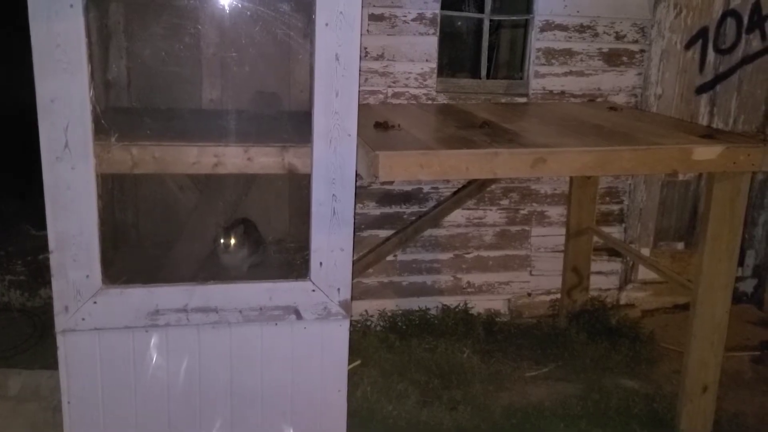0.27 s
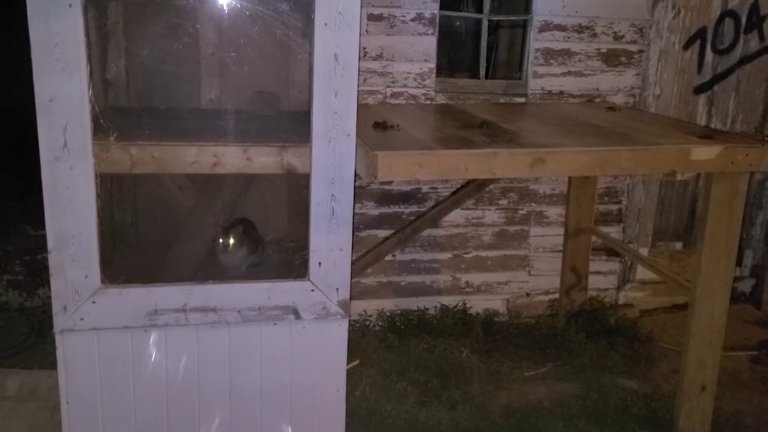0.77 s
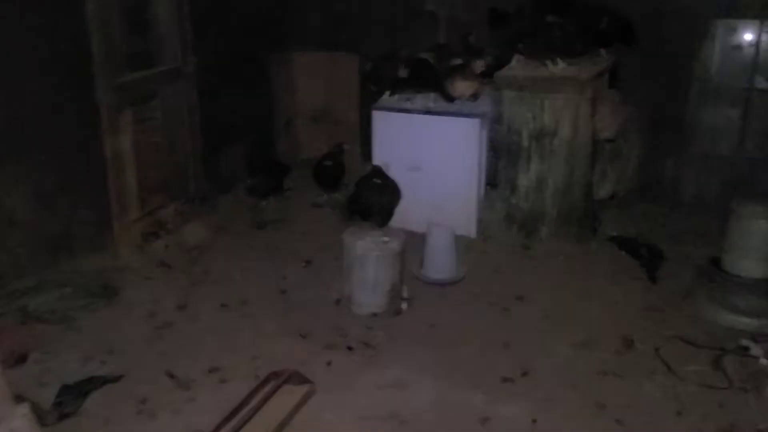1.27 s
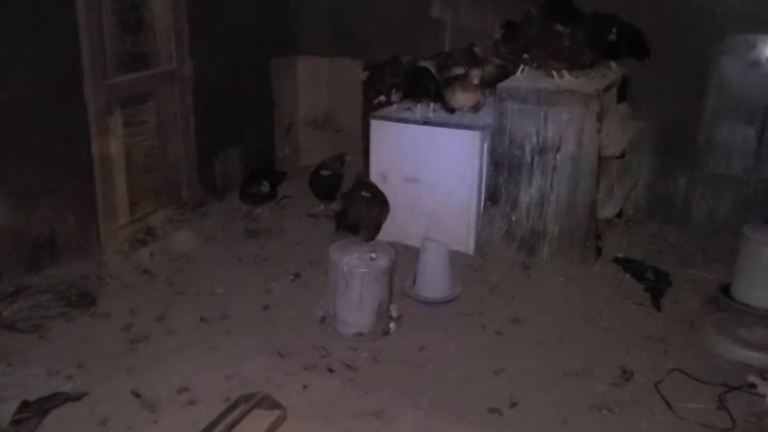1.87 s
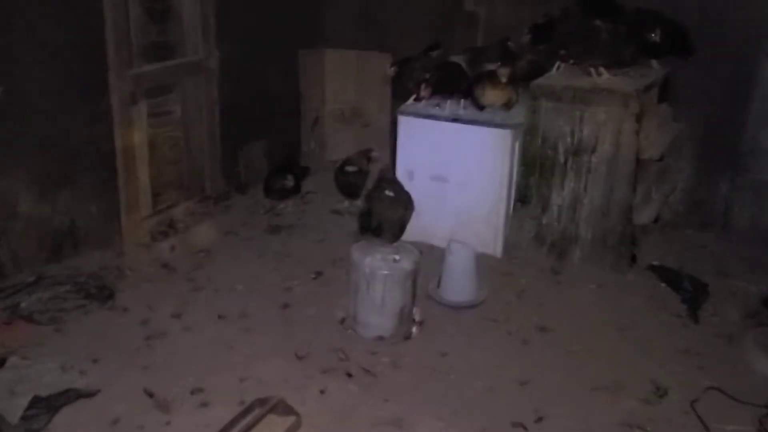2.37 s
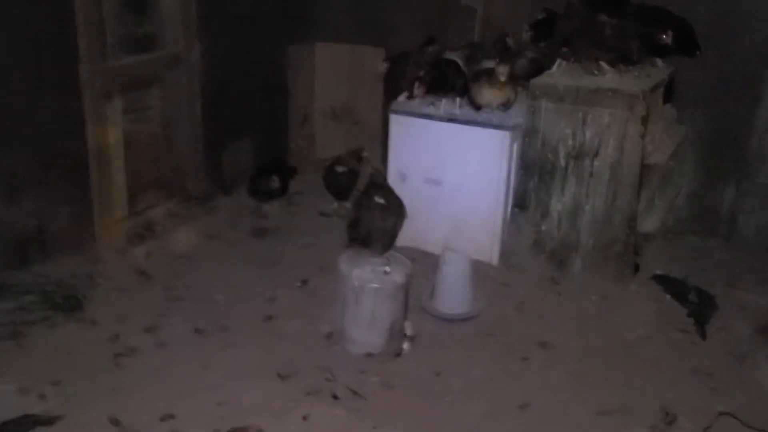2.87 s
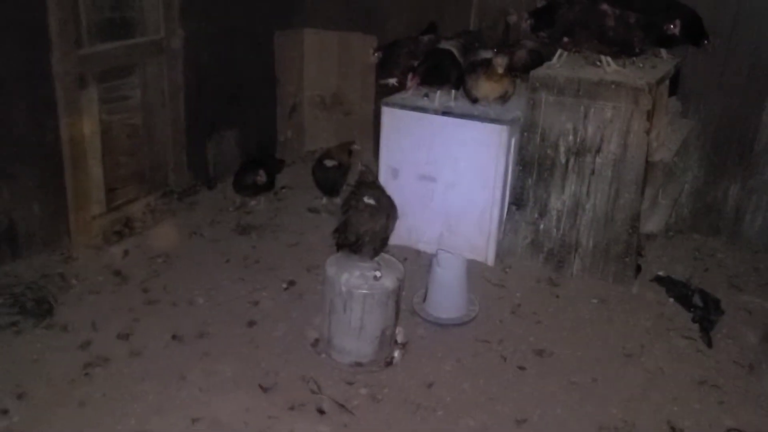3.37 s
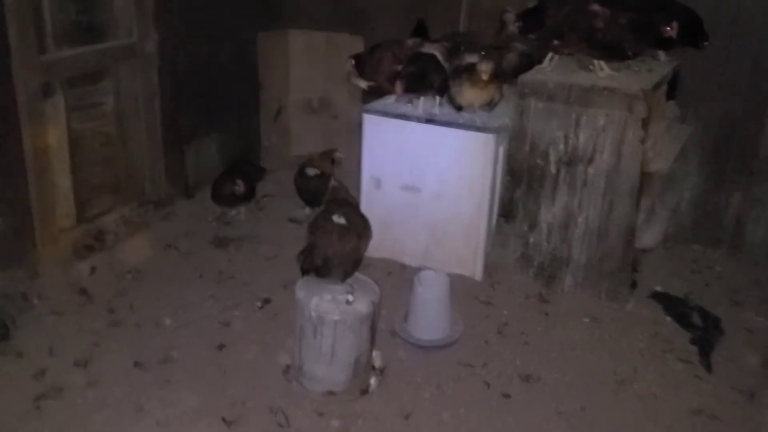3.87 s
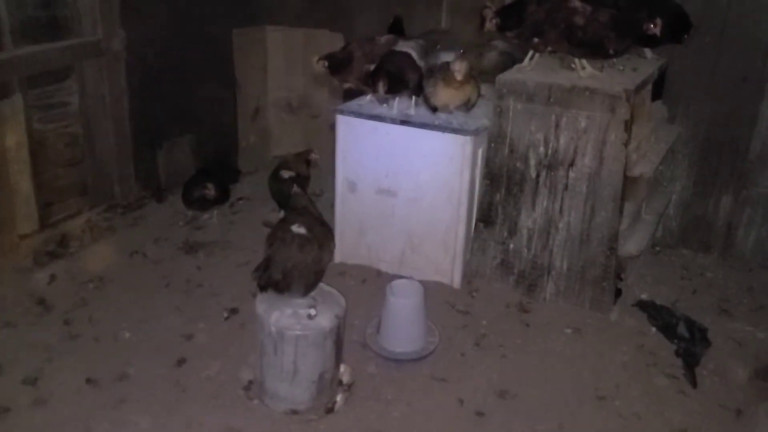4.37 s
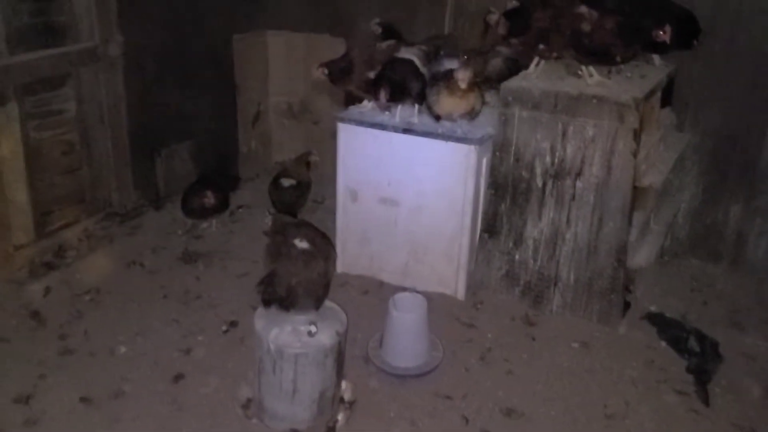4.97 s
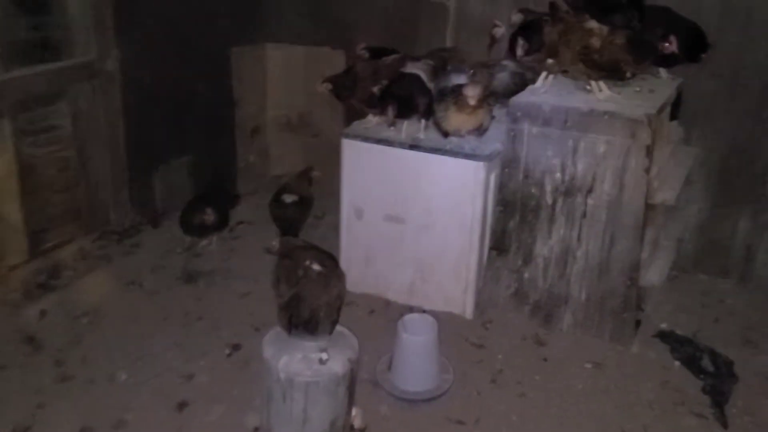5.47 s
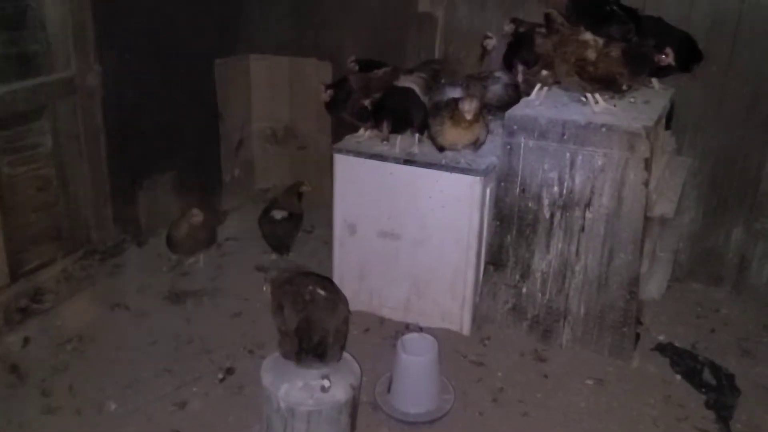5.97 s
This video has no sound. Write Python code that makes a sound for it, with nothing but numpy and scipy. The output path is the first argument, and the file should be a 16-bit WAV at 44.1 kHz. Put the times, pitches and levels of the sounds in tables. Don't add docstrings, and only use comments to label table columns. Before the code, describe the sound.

Very quiet night air outdoors with faint high cricket trills, one closer at the left, over a low hum. It cuts abruptly into a small plank coop: dry litter scuffs, a hollow feeder is bumped, and a hen gives a short throaty cluck. After sparse ticks and a low wall boom, another hen squawks sharply, birds scramble, a board is knocked, and rustling settles. Close stereo microphone near the floor, slight hiss.

```python
import sys
import numpy as np
from scipy import signal
from scipy.fft import rfft, irfft, next_fast_len
from scipy.io import wavfile
from scipy.ndimage import uniform_filter1d, map_coordinates

SR = 44100
rng = np.random.default_rng(int(sys.argv[2]) if len(sys.argv) > 2 else 0)


def dump(signal):
    limited = np.clip(np.atleast_2d(signal).T, -1, 1)
    pcm = np.round(limited * 32767).astype(np.int16)
    wavfile.write(sys.argv[1], SR, pcm)


def nominal_scale(level):
    x = np.asarray(level, float) / 20
    return 10 ** x


N = 273640
TIME = np.arange(N) / SR
INSIDE_S = 1.633
LEAD = 400
LEAD_S = LEAD / SR

# f/Hz, density/dB
NIGHT_AIR = [(15, -40), (25, -10.5), (86, -3), (99, -11), (133, -19), (165, -22.5), (234, -28.5),
             (268, -28.5), (390, -26.5), (600, -30.5), (950, -31.5), (1250, -27.5), (1800, -33.5),
             (4170, -37), (4780, -43.5), (6420, -57.5), (15600, -44.5)]
NIGHT_AIR_DB = -61.5
# t/s, length/s, level/dB
CRICKET_TRILLS = [
    (.075, 0.2, -82.5),
    (.4, .14, -82),
    (.575, .03, -84),
    (.625, .02, -84),
    (.67, 0.064, -82),
    (.78, .07, -87),
    (.897, .13, -82),
    (1.05, .06, -88),
    (1.16, 0.31, -83),
    (1.518, 0.13, -82),
]
# t/s, level/dB
NEAR_CHIRPS = [(.085, -3), (.14, -3), (.185, 4), (.232, 1), (.28, -2), (.44, -2), (.485, -2), (.53, 1),
               (.587, 1), (.635, -1), (.685, -3), (.732, -3), (.78, -2)]
CHIRP_HZ, CHIRP_FALL_HZ, CHIRP_S, CHIRP_DB, CHIRP_GAP_S = 4810, 560, .028, -80.5, .048

# t/s, length/s, level/dB
FLOOR_STEPS = [(1.606, 0.05, -58), (1.738, 0.026, -54.5), (2.078, 0.026, -56), (3.06, 0.036, -67),
               (3.22, 0.03, -58), (3.442, 0.022, -64.5), (3.587, 0.05, -54.5), (3.841, 0.14, -59),
               (3.975, 0.021, -56), (4.067, 0.19, -59), (4.195, 0.14, -63.5), (4.431, 0.046, -41.5),
               (4.654, 0.058, -62), (4.761, 0.072, -48.5), (4.914, 0.49, -59.5), (5.249, 0.063, -50.5),
               (5.4, 0.063, -48), (5.481, 0.27, -51), (5.8, 0.17, -55), (6.046, 0.12, -59.5)]
# t/s, length/s, level/dB, weight/dB,
# dryness/dB
SCUFFS = [(1.655, 0.073, -73, -4, 2), (1.755, 0.021, -75.5, 15, 3), (1.78, 0.075, -73.5, -9, 1),
          (1.885, 0.057, -48.5, -5, -16), (2.03, 0.07, -60.5, -1.5, -2), (2.15, 0.1, -70.5, -0.5, -6),
          (2.54, 0.055, -68.5, 5.5, -18), (2.64, 0.094, -67, 0.5, -7), (2.86, 0.13, -64, 0.5, -18),
          (3.04, 0.093, -67, 3.5, -21), (3.14, 0.012, -66.5, 10, -19), (3.6, 0.16, -67.5, -2, -7.5),
          (3.87, 0.091, -68, -2.5, -13), (3.935, 0.031, -65, 5, -16), (4.05, 0.1, -58, -2.5, -18),
          (4.115, 0.032, -56, -16, -17), (4.19, 0.16, -70.5, -3, -23),
          (4.3, 0.025, -62.5, -10, -7), (4.345, 0.071, -48, -7.5, -18), (4.401, 0.095, -43.5, -0.5, -12),
          (4.469, 0.045, -45, -16, -7.5), (4.54, 0.1, -49.5, -20, -20), (4.63, 0.036, -43, -5, -24),
          (4.7, 0.068, -66, 5, -12), (4.885, 0.049, -51.5, -7.5, -16.5), (4.935, 0.13, -56.5, -2, -8),
          (5.035, 0.074, -53, -5.5, -9), (5.1, 0.079, -54, -4.5, -29), (5.225, 0.077, -50.5, -1, -24),
          (5.32, 0.058, -56, -6.5, -18), (5.4, 0.15, -62, -1.5, -15.5), (5.57, 0.23, -64, -5, -26),
          (5.889, 0.19, -68, 6, -3.5)]
# f/Hz, density/dB
LITTER = [(59, -30), (100, 0.5), (185, -7.5), (259, -2), (355, -4), (520, -4), (714, -2), (920, -3.5),
          (1850, -7), (2280, -10.5), (3270, -11), (6030, -34), (7610, -37.5), (11400, -33.5),
          (15600, -38.5)]
STIR_DB = (-74.5, -76, -72, -69, -78)
FLICKER = (.5, .9, .9, .8, .6)
SCRAPE_SHARE, SCRAPE_DB = 0.88, -0.5
ATTACK_S, ATTACK_SHARE, RELEASE_S, RELEASE_SHARE = 0.0067, 0.11, 0.17, 2.4

# t/s, peak/dB, ring f/Hz, thud/dB, chaff/dB
TICKS = [
    (2.4943, -46.5, 1840, -14, -44),
    (2.5259, -45.5, 1910, -14, -44),
    (4.5053, -31.5, 1776, -7.5, -21),
    (4.6292, -32, 2626, -25, -17),
    (4.9439, -49.5, 3900, -13, -39),
    (5.0374, -43, 4680, 0, -4.5),
    (5.1423, -38.5, 2033, -24, -39),
    (5.998, -57.5, 4910, 3, -8),
]
# t/s, peak/dB, thud/dB, chaff/dB
SNAPS = [(1.6342, -49, -4, -29), (1.66, -50, -12, -27), (1.765, -44, -4.5, -23), (1.9732, -55, -17, -34),
         (2.6533, -55, 6, -23), (2.857, -34.5, -22, -31), (3.1503, -43, -16, -46), (2.4958, -44, -26, -38),
         (2.5303, -42, -22, -43), (3.589, -63, 8.5, -24), (4.486, -29.5, -9.5, -22), (4.601, -44, -24, -18),
         (4.908, -55, -22, -16), (5.0341, -44, -5, 0), (5.144, -27.5, -31, -23)]
# t/s, peak/dB, ring f/Hz, t60/s
BUMPS = [
    (1.631, -46.5, 91.5, 0.07),
    (2.116, -46, 85.5, 0.094),
    (2.565, -51, 540, 0.053),
    (2.579, -61, 280, 0.093),
    (2.902, -51, 260, 0.03),
    (2.964, -47.5, 216, 0.027),
    (3.6, -50, 100, 0.062),
    (3.947, -66, 100, 0.031),
]
# t/s, peak/dB, favoured f/Hz, contact/s, crunch/dB
NUDGES = [(1.716, -61, 850, 0.0034, -20), (1.74, -49, 850, 0.005, -20), (1.88, -36, 740, 0.016, -17),
          (1.901, -35.5, 705, 0.035, -22), (2.025, -33.5, 820, 0.0082, 0), (2.04, -41, 970, 0.017, -20),
          (2.094, -39, 690, 0.0059, -40), (2.115, -54.5, 716, 0.028, -30), (2.494, -52, 750, 0.0066, -13),
          (2.845, -53, 1033, 0.011, -14), (2.857, -48, 1020, 0.0021, -13), (3.15, -51.5, 605, 0.012, -33),
          (5.038, -36.5, 770, 0.036, -16), (5.846, -66, 800, 0.0039, -21), (5.929, -46.5, 754, 0.0042, -39),
          (5.945, -46, 800, 0.0096, -30), (5.97, -55, 850, 0.021, -23)]
# f/Hz, level/dB, t60/s
FEEDER_MODES = [(294, -2, 0.083), (612, 0, 0.084), (690, -2, 0.077), (787, 1.5, 0.049), (850, -4.5, 0.045),
                (928, 0, 0.0095), (1026, -2.5, 0.083), (1183, 4.5, 0.027), (1228, 1, 0.02),
                (1630, -11, 0.043), (1940, -12.5, 0.029), (2395, -8, 0.024)]
# f/Hz, level/dB
CRUNCH = [(1300, -12), (1650, -7), (2150, -17), (2600, -7), (3100, 0), (3600, -7), (4200, -7), (4900, -12)]
# t/s, pitch f/Hz, level/dB
CLUCK = [
    (1.877, 264, -60),
    (1.884, 258.4, -52),
    (1.899, 256.3, -43),
    (1.903, 254.3, -31.5),
    (1.915, 256.4, -35),
    (1.928, 259.2, -31.5),
    (1.942, 257.7, -34.5),
    (1.95, 252, -53),
    (1.97, 248, -68),
]
# multiple, level/dB
CLUCK_HARMONICS = [(1, -19), (2, -31), (3, -5), (4, 0.5), (5, -11), (6, -20), (7, -19), (8, -20), (9, -22),
                   (10, -24)]
FLUTTER_HZ, FLUTTER_DEPTH = 81, .3
# t/s, peak/dB, ring f/Hz, contact/s
CHATTER = [(1.925, -50, 3800, 0.023), (2.031, -57, 3100, 0.015), (2.03, -57, 4740, 0.021),
           (1.885, -57, 4540, 0.026), (2.028, -45, 2555, 0.014), (2.051, -53, 2930, .035),
           (5.034, -51, 8300, .022), (2.5, -52.5, 1350, .025), (2.495, -48, 1900, .007),
           (2.527, -47, 1780, 0.015), (2.858, -46.5, 3200, 0.0029), (2.86, -52, 1970, 0.0084),
           (3.276, -60, 2800, .004), (4.056, -62, 3100, .025), (4.068, -50.5, 1560, .03),
           (4.131, -60, 2400, .012), (4.142, -51, 1850, .015), (4.6, -57, 1700, .02),
           (4.245, -56, 1600, .04), (4.561, -41.5, 1100, .003), (4.575, -45, 1700, .003),
           (4.607, -43, 1200, .015), (4.658, -43, 2300, .004), (5.04, -57, 5200, .035),
           (5.036, -50, 3200, .006), (4.508, -36, 1700, 0.0027), (5.04, -46.5, 4750, 0.02),
           (5.144, -51, 13000, .002), (5.148, -84, 13100, 0.046), (5.9, -71, 11500, .19)]
# t/s, f/Hz, level/dB
BOOM = [
    (3.088, 69, -48),
    (3.1, 67.3, -36),
    (3.146, 68, -31.5),
    (3.242, 66.3, -63.5),
    (3.256, 68.5, -48.5),
    (3.27, 67.6, -70),
]
# f/Hz, level/dB, t60/s
BOOM_OVERTONES = [(125, -35.5, 0.086), (201.5, -43, 0.16), (266, -50.5, 0.16), (412, -46.5, 0.088)]
# t/s, length/s, level/dB
DRAG = [
    (4.062, 0.043, -63),
    (4.128, 0.034, -66),
    (5.232, 0.12, -50.5),
    (5.362, 0.089, -58.5),
    (5.465, .1, -60.5),
    (5.587, 0.11, -63.5),
    (5.806, 0.051, -75),
]
# t/s, pitch f/Hz, level/dB, beak gain per harmonic/dB
SQUAWK = [
    (4.335, 1408, -52, -17),
    (4.343, 1307, -44, -2),
    (4.351, 1251, -36.5, -6.5),
    (4.357, 1062, -39.5, 0),
    (4.365, 900, -34, -3),
    (4.377, 823, -39, -2.5),
    (4.39, 849.6, -42, 0),
    (4.416, 860, -41, 0),
    (4.465, 863, -55, -8),
]
# f/Hz, level/dB
THROAT = [(400, -34), (850, -7), (1050, 2), (1350, 3), (1720, 11), (2150, 4), (2550, -1), (3400, -8),
          (4300, -11), (5100, -19), (9000, -50)]
WAVER_DB = 1.6
RASP_DB = -15
# t/s, peak/dB
KNOCK = (4.7697, -28.5)
# f/Hz, level/dB, t60/s
BOARD_MODES = [(80.4, -9, 0.15), (290, -23, 0.31), (369, 1, 0.2), (470, -7, 0.28), (497, -3, 0.51),
               (571, -7, 0.28), (690, -6.5, 0.26), (800, -9, 0.45), (1015, 1, 0.078), (1390, -31, 0.43),
               (1830, -41, 0.34), (2130, -29, 0.21), (2400, -10, 2.0), (2500, -15, 0.57)]

# t/s, left minus right level/dB, right port lag/ms
BEARING = [
    (1.6, -13.5, -0.031),
    (1.95, -1.5, 0.17),
    (2.05, -1.5, -0.17),
    (2.5, -6, 0.077),
    (3.0, -4.5, 0.25),
    (4.3, -4.5, 0.28),
    (4.7, -4, 0.27),
    (4.8, -5.5, 0.055),
    (5.0, -3.5, 0.38),
    (6.2, -4, 0.17),
]
ROOM_T60_S, ROOM_DB = 0.18, 1
HEN_ROOM_DB, FEEDER_ROOM_DB, TICK_ROOM_DB, CHATTER_ROOM_DB = -4.5, -5.5, -3, -6
# f/Hz, level/dB
PORTS = [(60, -1.5), (110, -2), (200, 1.5), (380, -0.5), (700, -0.5), (1290, 0.5), (2380, -4.5),
         (4400, 3.5), (8120, 13), (15000, -2)]
# f/Hz, level/dB
HOUSING = [(5200, -1), (6300, 1), (6900, -9.5), (7450, -13.5), (8100, -9.5), (8700, -5.5), (10000, -7.5),
           (12500, -4.5), (15000, -7)]
# f/Hz, level/dB
BAND_END = [(15700, 0), (15950, -60)]


def unit(x):
    return x / np.sqrt(np.mean(x ** 2))


def curve(rows, order=1):
    rows = np.array(rows)
    return np.interp(TIME, rows[:, 0], rows[:, order])


def colour(x, points, lo_hz=20, hi_hz=17000):
    size = next_fast_len(x.shape[-1], True)
    hz = np.fft.rfftfreq(size, 1 / SR) + 1
    table = np.array(points)
    gain = nominal_scale(np.interp(np.log(hz), np.log(table[:, 0]), table[:, 1]))
    edges = 1 / np.sqrt((1 + (lo_hz / hz) ** 8) * (1 + (hz / hi_hz) ** 8))
    return irfft(rfft(x, size) * gain * edges, size)[..., :x.shape[-1]]


def walk(rate, size=N):
    hold = int(SR / rate)
    levels = np.repeat(rng.standard_normal(size // hold + 1), hold)
    return unit(uniform_filter1d(uniform_filter1d(levels, hold), hold)[:size])


def air(alike_hz):
    mid, side = rng.standard_normal((2, N))
    side = colour(side, [(alike_hz / 8, -9), (alike_hz / 2.8, -11), (alike_hz, -3), (alike_hz * 3, 1)])
    return np.array([mid + side, mid - side])


def bursts(rows, db, slow=0.92):
    t, power = TIME[::32], 0
    for (s, length, *_), peak_db in zip(rows, db):
        rise = np.clip((t - s) / (slow * (ATTACK_S + ATTACK_SHARE * length)), 0, 1)
        fall_db = -60 * np.maximum(t - s - length, 0) / (slow * (RELEASE_S + RELEASE_SHARE * length))
        power = power + (rise * nominal_scale(peak_db + fall_db)) ** 2
    return np.interp(TIME, t, np.sqrt(power))


def ring(drive, modes):
    t = np.arange(int(.3 * SR)) / SR
    body = 0
    for k, (hz, db, t60) in enumerate(modes):
        decay = nominal_scale(db - 60 * t / max(t60, .004))
        body = body + (-1) ** k * decay * np.sin(2 * np.pi * hz * t)
    return signal.fftconvolve(drive, body)


def contact(hold_s, tail_s, snap=8.3):
    t = np.arange(int(.25 * SR)) / SR
    noise, grit = rng.standard_normal((2, len(t)))
    grit = nominal_scale(0.99 * unit(uniform_filter1d(grit, size=60)))
    fade = nominal_scale(-60 * np.maximum(t - hold_s, 0) / tail_s)
    force = noise * grit * fade * (1 + snap * np.exp(-t / 0.0021))
    return np.r_[np.zeros(LEAD), force]


def peak(x, db):
    return x * nominal_scale(db) / np.sqrt(2 * uniform_filter1d(x ** 2, size=180).max())


def add(out, x, s):
    i = int(s * SR)
    out[i:i + len(x)] += x[:N - i]


def near_cricket():
    u = np.linspace(-.5, .5, int(CHIRP_S * SR))
    tone = np.sin(2 * np.pi * np.cumsum(CHIRP_HZ - CHIRP_FALL_HZ * u) / SR)
    chirp = np.cos(np.pi * u) ** 2 * tone
    later = [(s, -2.5) for s in np.arange(.92, INSIDE_S, CHIRP_GAP_S)]
    out = np.zeros(N)
    for (s, db), chance in zip(NEAR_CHIRPS + later, rng.standard_normal((40, 2))):
        level = nominal_scale(CHIRP_DB + db + 1.5 * chance[0])
        add(out, chirp * level, s - CHIRP_S / 2 + .002 * chance[1])
    return out * np.array([[1.7], [.3]])


def night():
    still = unit(colour(air(220), NIGHT_AIR)) * nominal_scale(NIGHT_AIR_DB + .35 * walk(3))
    trill = 1 + 0.62 * np.sin(2 * np.pi * np.cumsum(42 + 4 * walk(3.8)) / SR)
    song_points = [(4400, -30), (4720, 1), (4850, 5.0), (4980, -2), (5300, -49)]
    song = unit(colour(rng.standard_normal((2, N)), song_points))
    swell = bursts(CRICKET_TRILLS, np.array(CRICKET_TRILLS)[:, 2], slow=0.22)
    chorus = nominal_scale(-2.5) * song * trill * swell
    hum_points = [(70, -17), (84, 9), (89, 15.5), (94, 18), (110, -41)]
    hum = nominal_scale(-72) * unit(colour(rng.standard_normal(N), hum_points))
    return still + (chorus + hum + near_cricket()) * (TIME < INSIDE_S)


def shuffle():
    stumble = walk(24.95)
    moves = SCUFFS
    db, weight_db, dry_db = np.array(moves).T[2:]
    floor = bursts(FLOOR_STEPS, np.array(FLOOR_STEPS)[:, 2], slow=0.75)
    weight = bursts(moves, db + weight_db, slow=1.22)
    scrape = bursts(moves, db + SCRAPE_SHARE * weight_db + SCRAPE_DB, slow=1.22)
    crunch = bursts(moves, db)
    chaff = bursts(moves, db + dry_db, slow=0.86)
    layers = [(floor, [(35, -14.5), (70, 2.0), (130, -6.0)], 35, 165),
              (weight, LITTER, 150, 500),
              (scrape, LITTER, 500, 1300),
              (crunch, LITTER, 1300, 5300),
              (chaff, LITTER, 5300, 16500)]
    out = 0
    for (gain, points, lo_hz, hi_hz), stir_db, flicker in zip(layers, STIR_DB, FLICKER):
        grain = unit(nominal_scale(2.4 * stumble + 1.13 * walk(60) + 0.88 * walk(300)) ** flicker)
        noise = unit(colour(air(810) * grain, points, lo_hz, hi_hz))
        out = out + noise * np.hypot(gain, nominal_scale(stir_db))
    pan_db = curve(BEARING) + 3.6
    fade_in = np.clip((TIME - INSIDE_S - .02) / 0.0065, 0, 1)
    return out * nominal_scale(np.array([pan_db, -pan_db]) / 2) * fade_in


def ticks():
    out = np.zeros(N)
    for s, db, hz, thud_db, chaff_db in TICKS:
        force = contact(.003, 0.03, snap=1.7)
        modes = [(hz * .71, -6, .012), (hz * .93, -3, .012), (hz * 1.02, 0, .013), (hz * 1.13, -5, .01)]
        crack = colour(force, [(1000, 0), (hz, 3), (5500, -6)], 1000, 3870)
        add(out, peak(ring(force, modes), db - 0.5), s - LEAD_S)
        add(out, peak(crack, db - 2.5), s - LEAD_S)
        add(out, peak(colour(force, LITTER, 110, 670), db + thud_db), s - LEAD_S)
        add(out, peak(colour(force, LITTER, 8000), db + chaff_db), s - LEAD_S)
    for s, db, thud_db, chaff_db in SNAPS:
        snap = contact(.001, .014)
        bands = ((990, 3500, -11.0), (119, 470, thud_db), (6840, 12000, chaff_db))
        for lo_hz, hi_hz, share_db in bands:
            add(out, peak(colour(snap, LITTER, lo_hz, hi_hz), db + share_db), s - LEAD_S)
    for s, db, hz, t60 in BUMPS:
        bump = ring(np.hanning(40), [(hz, 0, t60), (hz * 0.97, -6, t60 * .5)])
        add(out, peak(bump, db), s)
    return out


def feeder():
    out = np.zeros(N)
    shell = [(250, 7), (450, -16.5), (620, -4.5), (3000, 8)]
    for s, db, touched_hz, hold_s, crunch_db in NUDGES:
        grip = 1 + 0.0064 * rng.standard_normal(len(FEEDER_MODES))
        modes = []
        for (hz, mode_db, t60), retune in zip(FEEDER_MODES, grip):
            loss_db = min(30 * abs(np.log2(hz / touched_hz)), 20)
            modes.append((hz * retune, mode_db - loss_db, min(t60, .042)))
        hollow = colour(ring(contact(hold_s, 0.032, snap=1.0), modes), shell, 216)
        crunch = colour(contact(hold_s, 0.06, snap=.3), CRUNCH, 1290, 3640)
        chaff = colour(contact(hold_s, 0.1), LITTER, 4400)
        add(out, peak(hollow, db), s - LEAD_S)
        add(out, peak(crunch, db + crunch_db), s + 0.0043 - LEAD_S)
        add(out, peak(chaff, db + crunch_db - 30.0), s - LEAD_S)
    return out


def cluck():
    span = slice(int(CLUCK[0][0] * SR), int(CLUCK[-1][0] * SR))
    size = span.stop - span.start
    hz = curve(CLUCK)[span] * (1 + .008 * walk(200, size))
    phase = 2 * np.pi * np.cumsum(hz) / SR
    voice = 0
    for k, db in CLUCK_HARMONICS:
        voice = voice + nominal_scale(db + 1.5 * walk(150, size)) * np.sin(round(k) * phase + k ** 2)
    throb = 1 + FLUTTER_DEPTH * np.sin(2 * np.pi * FLUTTER_HZ * TIME[:size])
    out = np.zeros(N)
    out[span] = voice * throb * nominal_scale(curve(CLUCK, order=2)[span])
    return out


def chatter():
    out = np.zeros(N)
    for s, db, hz, hold_s in CHATTER:
        modes = [(hz * .9, -5, .006), (hz * .96, -2, .008), (hz * 1.02, 0, .01), (hz * 1.09, -4, .006)]
        add(out, peak(ring(contact(hold_s, 0.049, snap=0.65), modes), db), s - LEAD_S)
    return out


def boom():
    start = BOOM[0][0] + 0.00306
    swing = np.sin(2 * np.pi * np.cumsum(curve(BOOM) * (TIME > start)) / SR)
    stop = np.clip((BOOM[-1][0] - TIME) / 0.018, 0, 1)
    out = np.sqrt(2) * swing * nominal_scale(curve(BOOM, order=2)) * stop
    add(out, ring(np.hanning(140) / 50, BOOM_OVERTONES), start + 0.0018)
    return out


def drag():
    hollow = [(1150, -18), (1380, 0), (1500, 6.0), (1680, -2.5), (2100, -31), (3100, -5), (4100, -20),
              (4850, -12.5), (5400, -25.5)]
    song = unit(colour(air(300), hollow, 900, 5500))
    return song * nominal_scale(2.1 * walk(80)) * bursts(DRAG, np.array(DRAG)[:, 2], slow=0.76)


def squawk():
    span = slice(int(SQUAWK[0][0] * SR), int(SQUAWK[-1][0] * SR))
    size = span.stop - span.start
    db, beak_db = curve(SQUAWK, order=2)[span], curve(SQUAWK, order=3)[span]
    hz = curve(SQUAWK)[span] * (1 + .009 * walk(250, size))
    phase = 2 * np.pi * np.cumsum(hz) / SR
    throat_hz, throat_db = np.array(THROAT).T
    voice = 0
    for k in range(1, 9):
        harmonic_db = np.interp(k * hz, throat_hz, throat_db) + WAVER_DB * walk(129, size)
        harmonic_db = harmonic_db + beak_db * (min(k, 4) - 1.5)
        voice = voice + nominal_scale(harmonic_db) * np.sin(k * phase)
    hoarse = 1 + .27 * walk(900, size)
    breath = rng.standard_normal(size) * (1 + np.cos(phase))
    rasp = unit(colour(breath, [(800, -8), (1500, 6.0), (3500, -9), (5500, -11)], 970, 5800))
    out = np.zeros(N)
    out[span] = (voice * hoarse + nominal_scale(RASP_DB + 7) * rasp) * nominal_scale(db)
    return out


def knock():
    s, db = KNOCK
    blows = np.zeros(1500)
    blows[[0, 290, 700, 1400]] = 1.07, 0.83, 0.49, 0.36
    modes = [(hz, g, min(.7 * t60, .1 if hz > 2300 else .085)) for hz, g, t60 in BOARD_MODES]
    out = np.zeros(N)
    add(out, peak(ring(np.convolve(blows, np.hanning(18)), modes), db - 1.5), s)
    rattle_points = [(200, 5.0), (600, -4), (1000, -2), (1400, -10), (2000, -18.0), (3000, -18.5)]
    rattle = colour(contact(0.02, 0.32), rattle_points, 220, 2800)
    add(out, peak(rattle, db - 3), s - LEAD_S)
    return out


def room(x, stirred):
    t = np.arange(int(.35 * SR)) / SR
    tail = air(800)[:, :len(t)] * nominal_scale(-60 * t / ROOM_T60_S) * (t > .004)
    tail = tail / np.sqrt(np.sum(tail ** 2) / 2)
    pan_db = curve(BEARING) + 1.1
    lag = curve(BEARING, order=2) * SR / 2000
    direct = []
    for side in (1, -1):
        shifted = map_coordinates(x, [np.arange(N) + side * lag], order=2)
        direct.append(nominal_scale(side * pan_db / 2) * shifted)
    reverb = signal.fftconvolve(stirred[None], tail, axes=1)[:, :N]
    return np.array(direct) + nominal_scale(ROOM_DB) * reverb


def scene():
    outdoors, litter = night(), shuffle()
    grit, pail, rattle, board = ticks(), feeder(), chatter(), knock()
    birds = cluck() + squawk()
    direct = pail + birds + grit + rattle + board
    stirred = nominal_scale(FEEDER_ROOM_DB) * pail + nominal_scale(HEN_ROOM_DB) * birds + nominal_scale(TICK_ROOM_DB) * grit
    stirred = stirred + nominal_scale(CHATTER_ROOM_DB) * rattle + board
    return outdoors + litter + drag() + room(direct, stirred) + boom()


def top_cut(x):
    return signal.sosfilt(signal.butter(12, 15760, fs=SR, output="sos"), x)


def record(dry):
    ports = []
    for k in range(2):
        tilt = [(hz, db * (.5 - k)) for hz, db in PORTS]
        ports.append(colour(dry[k], tilt, 4.3, 23000))
    mix = colour(np.array(ports), HOUSING + BAND_END, 5, 21000)
    return top_cut(mix)


dry = scene()
out = record(dry)
dump(out)
```